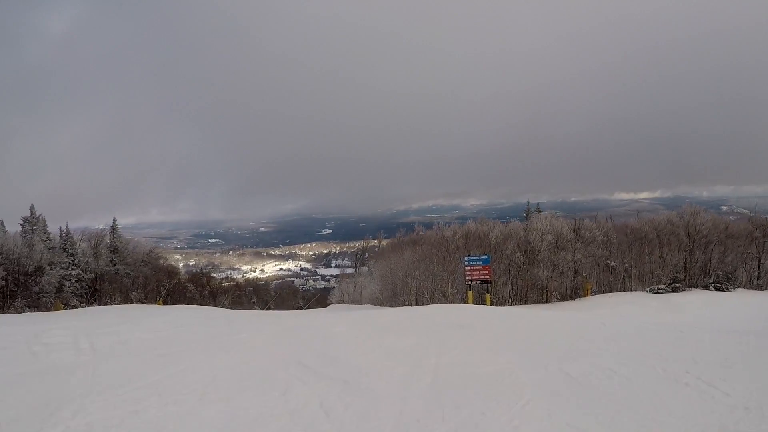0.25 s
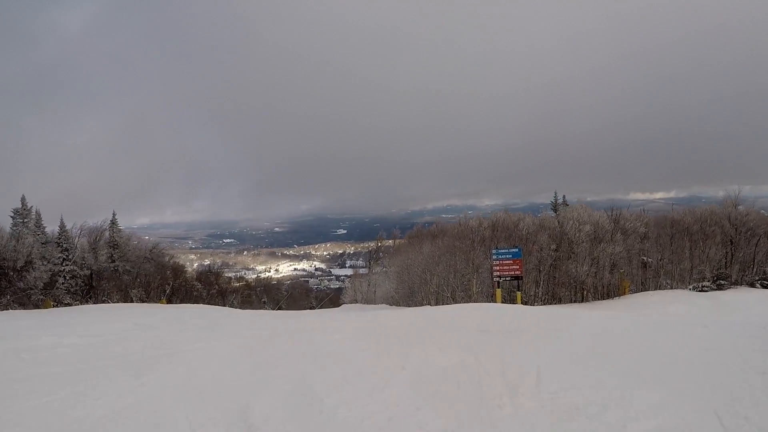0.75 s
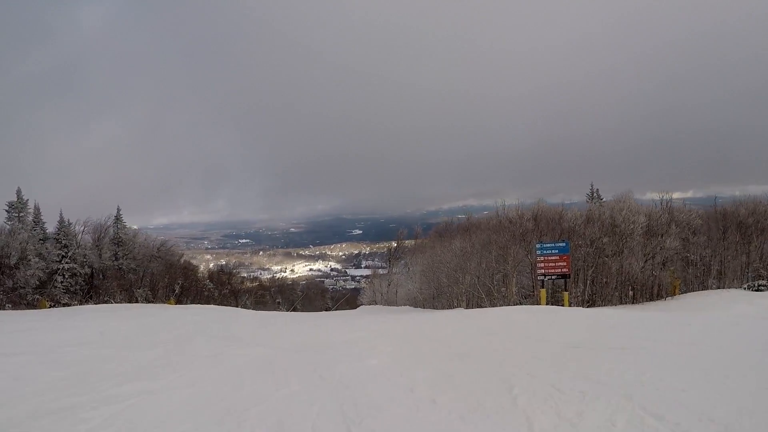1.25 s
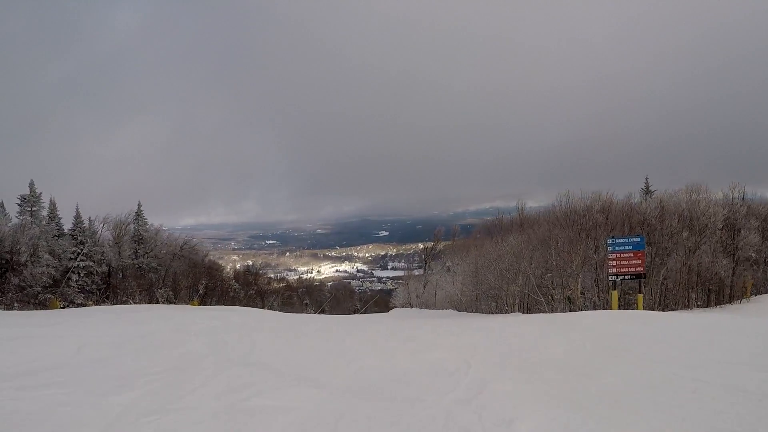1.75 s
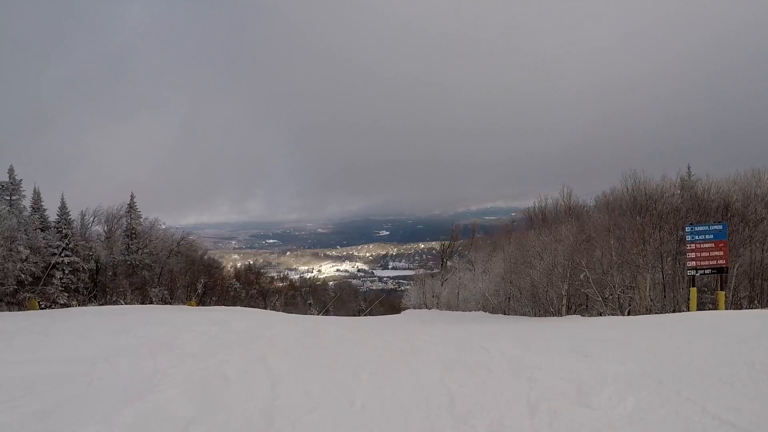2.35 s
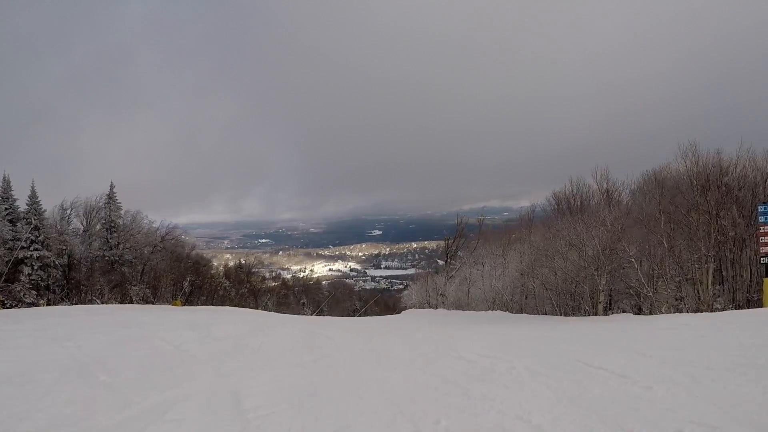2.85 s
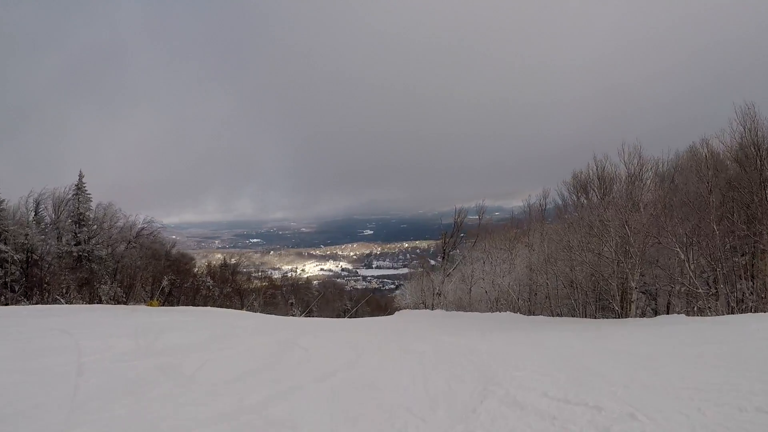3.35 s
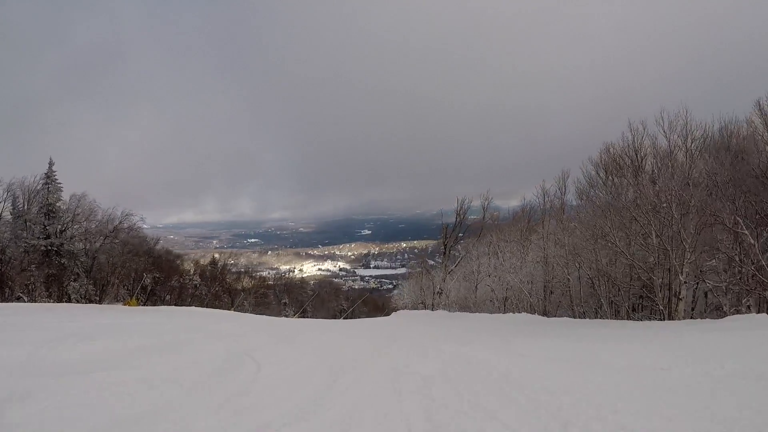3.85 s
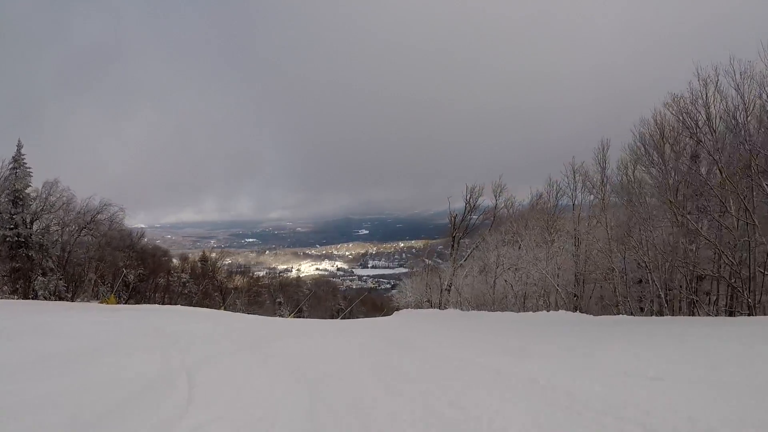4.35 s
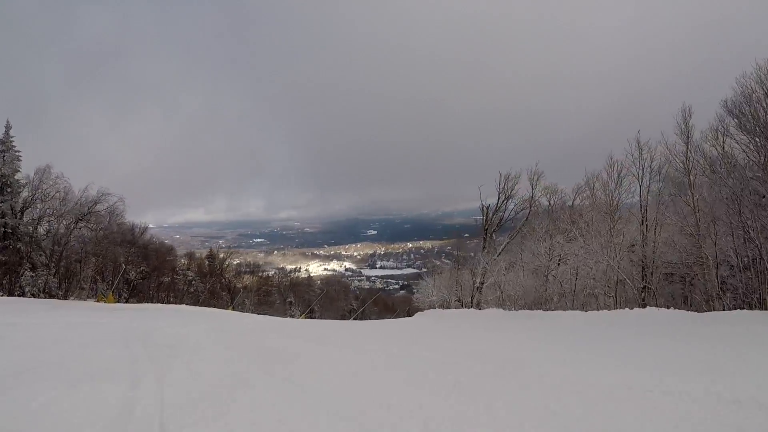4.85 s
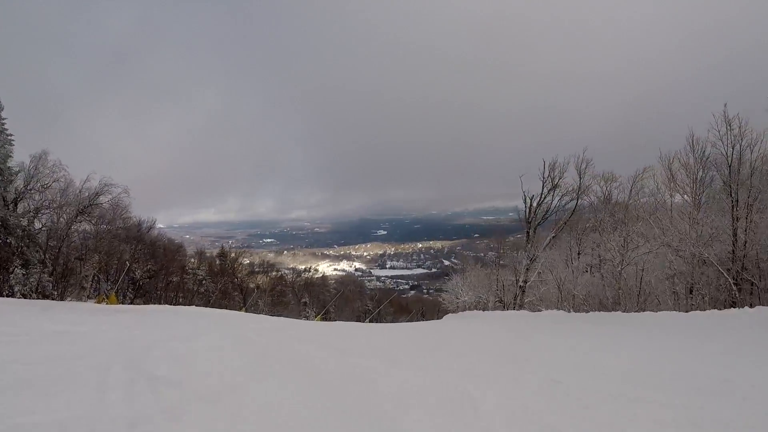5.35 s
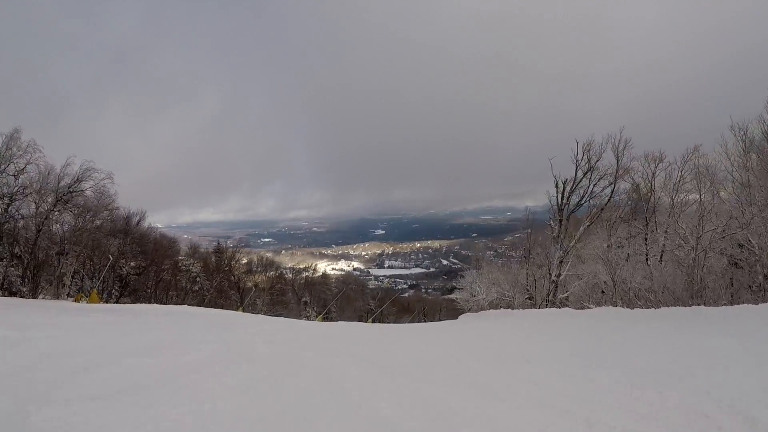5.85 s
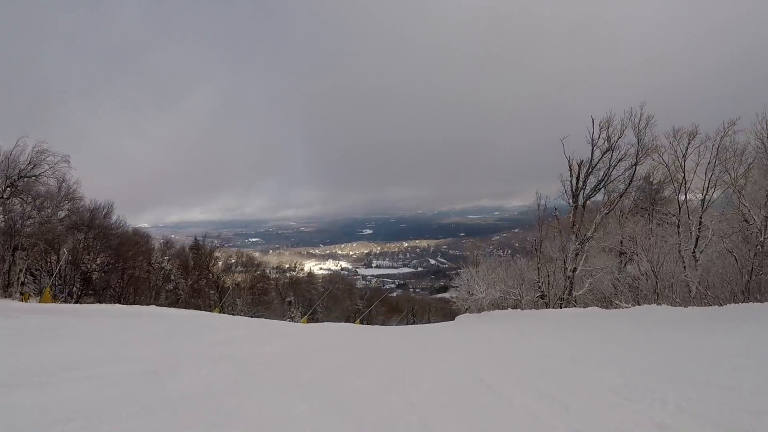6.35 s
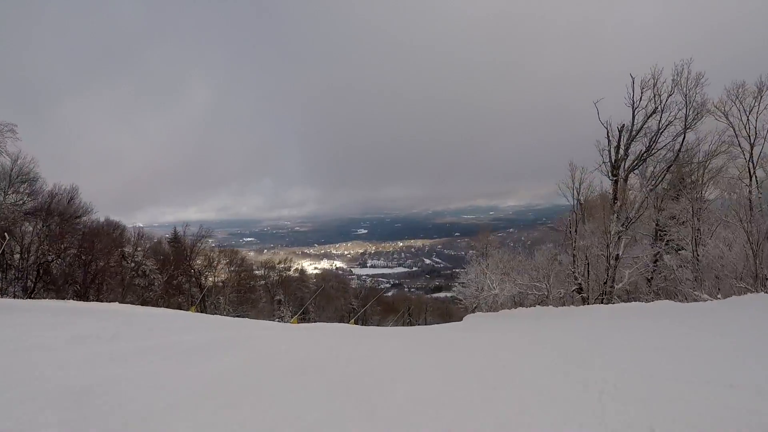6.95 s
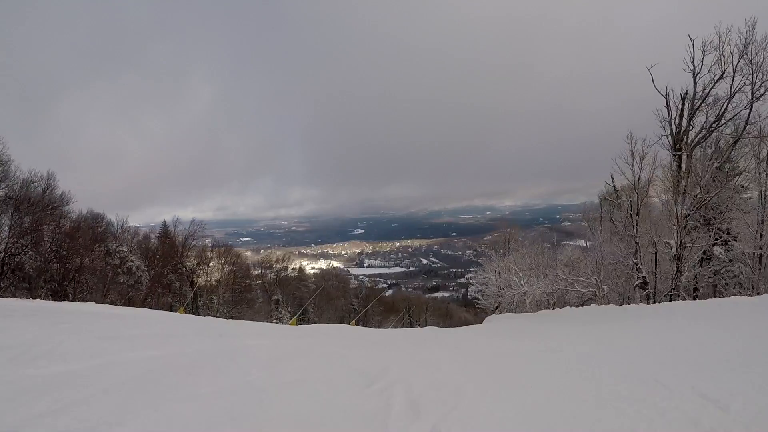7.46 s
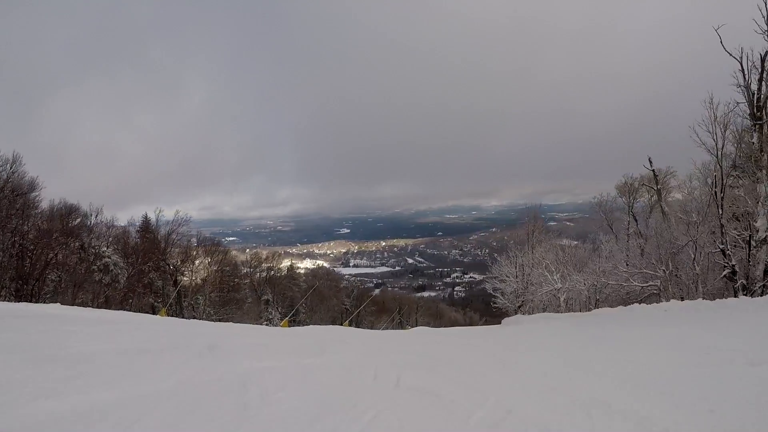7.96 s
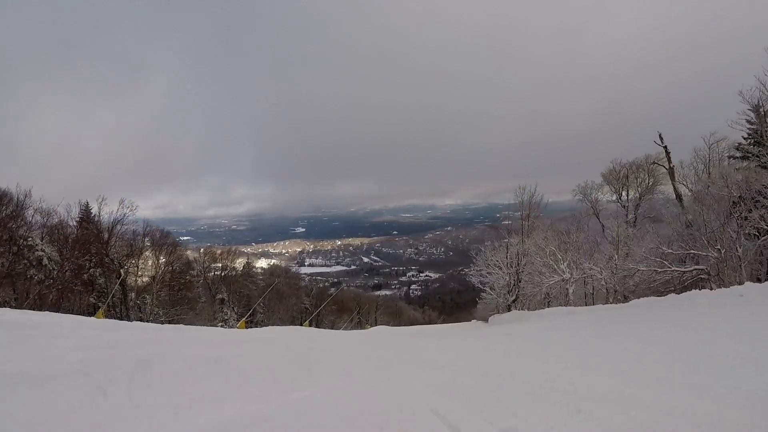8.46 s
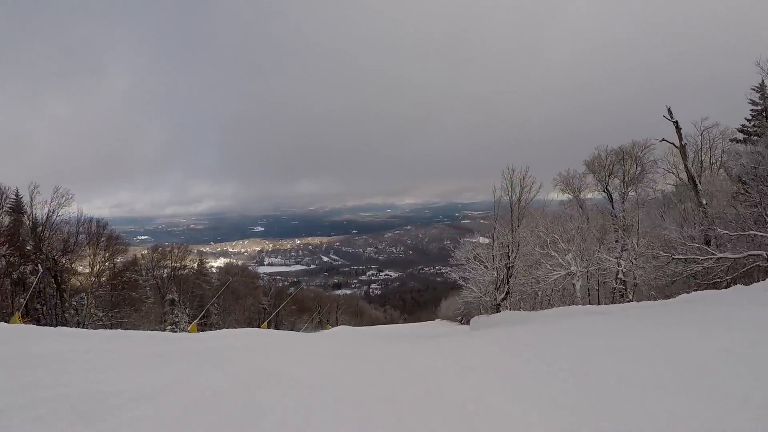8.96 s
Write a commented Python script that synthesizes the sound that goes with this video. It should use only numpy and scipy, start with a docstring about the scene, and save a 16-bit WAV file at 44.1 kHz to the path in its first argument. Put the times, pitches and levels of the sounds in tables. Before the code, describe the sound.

Skis glide down a slope of packed snow, heard from a microphone the skier carries. A bright hiss swells into a gritty scrape with each turn and eases in between. The skis chatter over ribbed patches and clack on hard lumps, loudest near the middle, and two tiny metallic ticks come early on. Throughout, a headwind rumbles and buffets the microphone in uneven gusts.

```python
"""Skis carve linked turns down a slope of packed snow, heard from a camera the skier carries.
Crystals shear under them: the bases hiss, and the edges scrape and throw spray in each turn.
The skis chatter on ribbed snow and clack over hard lumps; twice, grazed metal ticks.
Underneath, the headwind rumbles and buffets at the microphone."""
import sys
import numpy as np
from scipy import signal
from scipy.fft import rfft, irfft
from scipy.io import wavfile
from scipy.ndimage import uniform_filter1d

SR = 44100
rng = np.random.default_rng(int(sys.argv[2]) if len(sys.argv) > 2 else 0)


def materialize(psi):
    """Save the field psi as 16-bit PCM at rate SR to the path in sys.argv[1].

    A 1-D psi becomes a single channel; in a 2-D psi each row is a channel.
    """
    bounded = np.clip(np.atleast_2d(psi).T, -1, 1)
    quanta = np.round(bounded * 32767).astype(np.int16)
    wavfile.write(sys.argv[1], SR, quanta)


N = 406161
TIME = np.arange(N) / SR


def gain_of(db):
    """Decibels to amplitude."""
    return 10 ** (np.asarray(db) / 20)


def unit_rms(x):
    """Scales to rms 1."""
    return x / np.sqrt(np.mean(x ** 2) + 1e-20)


def eq_gain(curve, hz):
    """Gain of an EQ curve, its dB points joined on a log-frequency axis."""
    points_hz, db = np.transpose(curve)
    return gain_of(np.interp(np.log(hz + 1), np.log(points_hz + 1), db))


def coloured(x, curve, size=4096):
    """Minimum-phase EQ; the result has rms 1."""
    log_gain = np.log(eq_gain(curve, abs(np.fft.fftfreq(size, 1 / SR))))
    impulse = np.fft.ifft(np.exp(np.conj(signal.hilbert(log_gain)))).real
    return unit_rms(signal.fftconvolve(x, impulse[:size // 2])[:len(x)])


def resonance(x, hz, width):
    """One resonant band, its width in Hz."""
    return signal.lfilter(*signal.iirpeak(hz, hz / width, SR), x)


def add(mix, start_s, sound):
    """Mixes a sound in at a given time."""
    part = mix[max(round(start_s * SR), 0):][:len(sound)]
    part += sound[:len(part)]


def ease(u):
    """A smooth fade from 0 to 1."""
    return np.sin(np.pi / 2 * np.clip(u, 0, 1)) ** 2


def hump(centre_s, length_s):
    """A smooth swell from 0 to 1 and back."""
    return ease(1 - 2 * abs(TIME - centre_s) / length_s)


def swells(table):
    """One dB envelope from rows of time, length and height."""
    return sum(db * hump(s, length) for s, length, db in table)


def wander(rate_hz):
    """Smooth random modulation, rms 1, moving up to the given rate."""
    hz = np.fft.rfftfreq(N, 1 / SR)
    return unit_rms(irfft(rfft(rng.standard_normal(N)) / (1 + (hz / rate_hz) ** 4), N))


def grains(per_s, spread_db):
    """Snow crystals breaking: random clicks of uneven size."""
    size = gain_of(spread_db * np.minimum(rng.exponential(1, N), 5))
    return size * rng.standard_normal(N) * (rng.random(N) < per_s / SR)


def turbulence(curve, steady_s):
    """Low random pressure, its level evened out over the given time."""
    noise = irfft(rfft(rng.standard_normal(N)) * eq_gain(curve, np.fft.rfftfreq(N, 1 / SR)), N)
    return noise / np.sqrt(uniform_filter1d(noise ** 2, int(steady_s * SR)) + 1e-20)


# Headwind envelope: (time [s], strength [dB])
HEADWIND = [(0, 1.5), (0.16, -6.5), (0.42, -13), (0.85, -1.5), (1.6, -13.5), (2.65, -13), (3.07, -5.5),
            (3.55, -14), (4.2, -4), (4.8, 0), (5.3, -11), (5.6, -2.5), (6.65, -0.5), (7.45, -8.5),
            (7.8, -3), (8.5, -3), (8.97, -12), (9.21, -9)]
# Layer levels at 0 dB of headwind: (sway [dB], rumble [dB], eddies [dB])
WIND_BALANCE = [-12, -14.5, -26.5]
# Rise per dB of headwind: (sway [dB/dB], rumble [dB/dB], eddies [dB/dB])
WIND_TRACKING = [0.71, 1.113, 1.2]
# Short gusts: (crest [s], length [s], lift [dB], fineness [0 = deep sway, 1 = fine flutter])
GUSTS = [(0.158, 0.19, 8, 0.77), (0.878, 0.62, 5, 1.1), (1.343, 0.17, 9, 0), (2.407, 0.37, 8, 0.055),
         (2.808, 0.44, 8.5, 1.03), (3.057, .2, 7, 0), (5.4, .3, 5, 0.08), (6.72, 0.08, 5.5, 0.68),
         (7.193, 0.13, 9, 0.031), (7.56, 0.52, 5.5, 0), (7.747, 0.33, 4.5, 0.35), (8.126, 0.34, 6.5, .9),
         (8.727, 0.31, 3, 0.91), (9.155, .18, 11.5, 0.38)]


def wind_levels():
    """Gains of sway, rumble and eddies: all ride the headwind; a gust lifts those near its own size."""
    strength_db = np.interp(TIME, *np.transpose(HEADWIND))
    db = np.c_[WIND_BALANCE] + np.c_[WIND_TRACKING] * strength_db
    layer_fineness = np.c_[[0, 0.5, 1]]
    for s, length, lift_db, fineness in GUSTS:
        share = np.maximum(1 - 2 * (layer_fineness - fineness) ** 2, 0) ** 2
        db = db + lift_db * share * hump(s, length)
    return gain_of(db)


# EQ of the sub-bass sway, bass rumble and fluttering eddies: (frequency [Hz], level [dB])
SWAY_EQ = [(3, -6), (12, -3), (24, -1), (34, -0.5), (44, -8), (60, -17.5), (120, -53), (300, -75.5)]
RUMBLE_EQ = [(25, -19.5), (42, -5), (55, 2.5), (70, -3.5), (86, -5), (110, -12.5), (150, -22.5),
             (230, -31.5), (500, -76.5)]
EDDY_EQ = [(60, -15.5), (115, 2), (155, 2.5), (230, -7.5), (320, -18.5), (420, -22), (560, -38), (900, -63)]
# Single eddies thumping the microphone: (time [s], level [dB])
THUMPS = [(0.702, -16.5), (4.779, -18.5), (6.192, -12.5), (6.293, -17), (6.597, -10), (6.668, -20),
          (6.708, -21), (6.762, -9.5), (6.772, -18), (8.084, -14)]


def wind(thump_hz=190, ceiling=0.64):
    """Large eddies sway and rumble; small ones come in puffs and ride on the crests of the large."""
    sway, rumble, eddies = wind_levels()
    large = turbulence(SWAY_EQ, steady_s=0.194)
    middle = turbulence(RUMBLE_EQ, steady_s=0.113)
    small = turbulence(EDDY_EQ, steady_s=0.092)
    puffs = gain_of(2.9 * wander(rate_hz=13) + 3.05 * large)
    out = sway * large + rumble * middle + eddies * unit_rms(small * puffs)
    t = np.arange(-600, 600) / SR
    u = (np.pi * thump_hz * (t - 0.002)) ** 2
    thump = (1 - 2 * u) * np.exp(-u)  # one pressure crest between two troughs
    for s, db in THUMPS:
        add(out, s + t[0], gain_of(db) * thump)
    return out / (1 + (out / ceiling) ** 4) ** (1 / 4)  # the strongest gusts soft-clip


# Sharp metallic ticks: (time [s], pitch [Hz], level [dB], 60 dB decay [s])
TICKS = [(1.714, 8750, -30.5, 0.053), (2.933, 8850, -24.5, 0.1)]
# EQ of a bright, hard contact, shared with the clacks: (frequency [Hz], level [dB])
CRACK_EQ = [(2000, -19), (3200, 11), (3900, 2), (4400, 13), (5100, 10), (5900, 5), (7000, 0), (9500, -20),
            (15000, -35)]


def ticks(size=8192):
    """A small piece of metal is grazed: a brief scratch sets one high mode ringing."""
    out, t = np.zeros(N), np.arange(size) / SR
    for s, hz, db, t60 in TICKS:
        scratch = rng.standard_normal(size) * np.exp(-t / 0.0044)
        mode = np.sin(2 * np.pi * hz * t) * gain_of(-60 * t / t60)
        ring = signal.fftconvolve(scratch, mode)[:size]
        attack = gain_of(-16.5) * coloured(scratch, CRACK_EQ)
        add(out, s, gain_of(db) * (ring / abs(ring).max() + attack))
    return out


def light_taps(per_s=3.4, db=-35, crack_db=-2.5, thud_db=-17):
    """Lighter slaps at random moments, as rows like those of CLACKS."""
    times = rng.uniform(0, N / SR, round(per_s * N / SR))
    return [(s, db, crack_db, thud_db) for s in times]


# Skis slapping hard lumps: (time [s], level [dB], bright crack trim [dB], hollow thud trim [dB])
CLACKS = [(0.152, -30.5, -11, -13), (0.306, -26.5, -8, -15), (1.46, -32, -9, -10), (1.967, -35, -6, -11),
          (2.215, -34, -13, -16), (2.82, -29, -8, -18), (3.942, -32, -6, -16), (4.016, -29.5, -12, -7),
          (4.061, -26, -10, -4), (4.213, -15.5, -3, -14), (4.227, -19.5, -13, -10), (4.372, -25.5, -6, -19),
          (4.63, -25.5, -5, -22), (4.662, -22, -3, -19), (5.074, -29.5, -1.5, -8), (5.571, -29.5, -1, -8),
          (5.891, -24, 1.5, -7.5), (6.337, -34.5, 6, -16), (6.434, -19, -12, -21), (7.08, -24.5, 0.5, -10),
          (7.708, -26.5, -20, -19), (7.787, -27, -12, -6), (7.87, -34, -3, -11), (8.473, -33, -7, 2),
          (9.129, -35, 0.5, -27)]
# Ring of a slapped ski: (frequency [Hz], width [Hz], level [dB])
SLAP_MODES = [(856, 230, 0), (1414, 200, 0), (2040, 400, -3.5), (2363, 145, -3), (4320, 135, -5.5),
              (6030, 360, -6)]
# EQ of the rattle's midrange body: (frequency [Hz], level [dB])
RATTLE_EQ = [(400, -55), (800, -12), (1400, 3), (1650, 3), (2050, 8), (2320, 14), (2750, 6), (3600, -36),
             (7000, -77)]


def clacks(size=4096):
    """Each slap swells into a short ring; loose contacts rattle and buzz on as the ski settles."""
    out, t = np.zeros(N), np.arange(size) / SR
    settling = np.exp(-(t / 0.004) ** 2) + 0.3 * np.exp(-t / 0.018)
    for s, db, crack_db, thud_db in CLACKS + light_taps():
        ring = np.zeros(size)
        for hz, width, mode_db in SLAP_MODES:
            strength = gain_of(mode_db + crack_db * (hz > 3000) + thud_db * (hz < 1700))
            detuned_hz = hz * rng.uniform(0.93, 1.02)
            u = np.pi * width * t
            ring += strength * u * np.exp(1 - u) * np.sin(2 * np.pi * (detuned_hz * t + rng.random()))
        contacts = rng.standard_normal(size) * settling
        rattle = coloured(contacts, RATTLE_EQ) + gain_of(crack_db + 8) * coloured(contacts, CRACK_EQ)
        add(out, s, gain_of(db) * (ring + gain_of(-23) * rattle))
    return out


# Bending modes of ski and binding: (frequency [Hz], width [Hz], level [dB])
SKI_MODES = [(855, 100, -5), (1425, 99, -7), (1886, 60, 2.5), (2320, 127, 5.5), (2410, 100, -6.5)]
# Ribbed patches that shake the skis harder: (centre [s], length [s], lift [dB])
RIBBED_PATCHES = [(2.05, 0.7, 4), (6.38, 0.33, 9.5), (6.96, 0.17, 2), (7.78, 0.31, 7)]


def chatter(shake):
    """Clumps of tiny blows from the ribbed snow keep the skis ringing."""
    blows = grains(per_s=1400, spread_db=-0.5) * gain_of(6.9 * np.tanh(wander(rate_hz=20.4)))
    ring = sum(gain_of(db) * resonance(blows, hz, width) for hz, width, db in SKI_MODES)
    band = signal.butter(2, [650, 3200], "band", fs=SR, output="sos")
    return shake * gain_of(swells(RIBBED_PATCHES)) * unit_rms(signal.sosfilt(band, ring))


# Sudden accents from an edge: (time [s], glide [dB], skid [dB], scrape [dB], spray [dB])
EDGE_BITES = [(0.87, -39, -50, -46, -55), (1.05, -36.5, -40, -41, -66), (2.67, -39, -38, -45, -50.5),
              (2.97, -34, -50, -45.5, -64), (4.46, -45, -46, -52, -52.5), (4.96, -50, -48, -46.5, -69),
              (5.56, -37, -42.5, -48.5, -56), (5.8, -36, -48, -42.5, -63), (8.26, -45, -44, -51, -56),
              (8.48, -32.5, -46, -39, -58), (8.68, -43, -36.5, -54, -58)]


def edge_bites(rise_s=0.044):
    """Gains of glide, skid, scrape and spray as an edge digs in: fast attack, slower release."""
    out = np.zeros((4, N))
    for s, *layers_db in EDGE_BITES:
        u = np.maximum(TIME - s, 0) / rise_s
        out += gain_of(np.c_[layers_db]) * (u * np.exp(1 - u))
    return out


# Starting mix on flat skis: (glide [dB], skid [dB], scrape [dB], spray [dB], chatter [dB])
FLAT_SKIS = [-45, -49, -55.5, -62, -50]
# Short skids alternating with long carves: (start [s], attack [s], hold [s], release [s],
# glide [dB], skid [dB], scrape [dB], spray [dB], chatter [dB])
TURNS = [(-0.4, 0.19, 0.16, 1, -36, -36.5, -45.5, -52, -48),
         (0.566, 0.41, 0.63, 0.56, -34.5, -40.5, -43, -50.5, -44),
         (2.576, .42, 0.11, 0.47, -33, -32.5, -41, -61, -43),
         (3.757, 0.46, 0.74, 0.25, -34, -43.5, -44.5, -51.5, -41.5),
         (5.478, 0.39, .04, 0.88, -37.5, -37.3, -48.5, -58, -45.5),
         (6.487, 0.56, 0.35, 0.77, -35.5, -44, -47, -56, -41),
         (8.114, 0.43, 0.093, 0.41, -35.5, -37, -41.5, -64, -44)]
# Fade once the edge is set, for each of those five layers: (rate [dB/s])
EDGE_SAG = [6.4, 14.6, 10.7, 11, 4.7]
# The skier rises and the skis go light: (centre [s], length [s], base dip [dB])
LULLS = [(1.22, .14, 2), (1.91, 0.095, 3), (2.48, 0.14, 6.5), (3.704, 0.27, 3.5), (5.48, 0.36, 3),
         (8.08, 0.34, 1.5)]
# How far each of the five layers ducks in a lull: (depth [times the base dip])
LULL_DEPTHS = [0.47, 1.1, 0.61, 1.7, 0.74]


def ski_levels(speed_db_per_s=0.33):
    """Gains of the five ski layers: each turn loads the edges, holds while sagging, and lets go."""
    power = gain_of(np.c_[FLAT_SKIS] + speed_db_per_s * TIME) ** 2  # louder as the skier gathers speed
    for start, attack, hold, release, *layers_db in TURNS:
        held_s = TIME - start - attack
        load = ease(1 + held_s / attack) * ease(1 - (held_s - hold) / release)
        sag_db = np.c_[EDGE_SAG] * np.maximum(held_s, 0)
        power = power + (load * gain_of(np.c_[layers_db] - sag_db)) ** 2
    return np.sqrt(power) * gain_of(-np.c_[LULL_DEPTHS] * swells(LULLS))


# EQ of the glide's hiss, skid's rush, gritty scrape and airy spray: (frequency [Hz], level [dB])
GLIDE_EQ = [(500, -24), (1200, -28), (1600, -10.5), (2700, -9.5), (3400, -6), (4200, 1), (5000, 2.5),
            (5700, 2), (6600, -6), (8000, -16.5), (9200, -20), (11000, -27), (16000, -74)]
SKID_EQ = [(2500, -28), (4800, -10.5), (5700, 4), (6400, 5.5), (7100, 2.5), (8100, -6), (9100, -11.5),
           (10300, -27), (12000, -32), (16000, -47)]
SCRAPE_EQ = [(120, -12.5), (280, 14.5), (400, 8), (520, 1), (780, 2.5), (1100, -3), (1480, 1.5), (1700, -3),
             (2600, -4), (3200, -3.5), (5500, -23.5)]
SPRAY_EQ = [(5000, -17), (8000, 8.5), (9300, 10.5), (10400, 2), (11500, -3.5), (12400, -0.5), (14000, -4),
            (15300, -12)]


def carving(glide, skid, scrape, spray):
    """Crystals shear under base and edge; uneven snow makes the layers flutter, partly together."""
    glide, skid, scrape, spray = np.hypot([glide, skid, scrape, spray], edge_bites())
    lumps = wander(rate_hz=29)
    hiss = grains(per_s=16000, spread_db=0.5) * gain_of(lumps)
    rush = grains(per_s=16000, spread_db=2.5) * gain_of(0.5 * lumps + 0.5 * wander(rate_hz=31))
    grit = grains(per_s=6000, spread_db=2.0) * gain_of(0.5 * lumps + 1.45 * wander(rate_hz=32))
    powder = grains(per_s=17000, spread_db=2.5) * gain_of(0.3 * lumps)
    return (gain_of(1.5) * glide * coloured(hiss, GLIDE_EQ)
            + gain_of(0.67) * skid * coloured(rush, SKID_EQ)
            + gain_of(6.5) * scrape * coloured(grit, SCRAPE_EQ)
            + gain_of(6.0) * spray * coloured(powder, SPRAY_EQ))


def scene():
    """The skis over a bed of wind, in mono."""
    glide, skid, scrape, spray, shake = ski_levels()
    return (wind() + carving(glide, skid, scrape, spray) + chatter(shake) + ticks() + clacks())[None]


# Hollows in the tone of the camera housing: (frequency [Hz], width [Hz])
HOUSING_NOTCHES = [(565, 202), (1115, 158)]


def record(dry, notch_depth=0.79, cutoff_hz=15250):
    """The housing scoops out two narrow bands; the camera's band limit cuts the top end."""
    for hz, width in HOUSING_NOTCHES:
        dry = dry - notch_depth * resonance(dry, hz, width)
    lowpass = signal.firwin(511, cutoff_hz, window=("kaiser", 9), fs=SR)
    return signal.oaconvolve(dry, lowpass[None], "same")


dry = scene()
out = record(dry)
materialize(out)
```